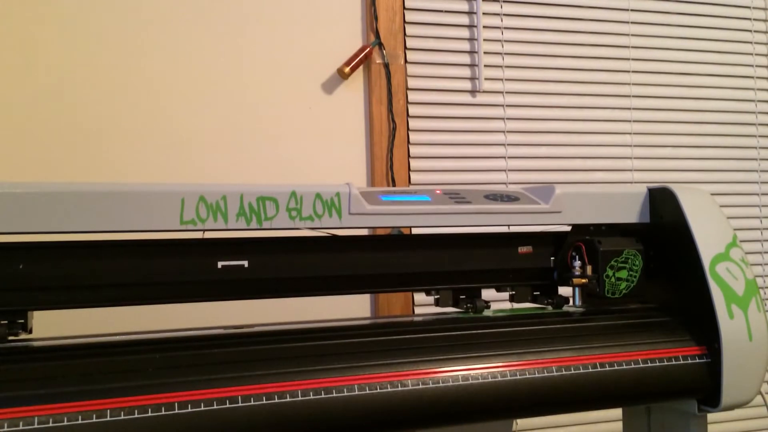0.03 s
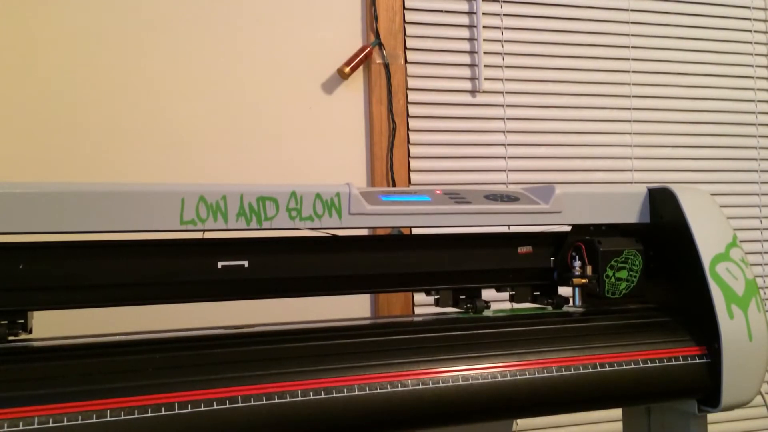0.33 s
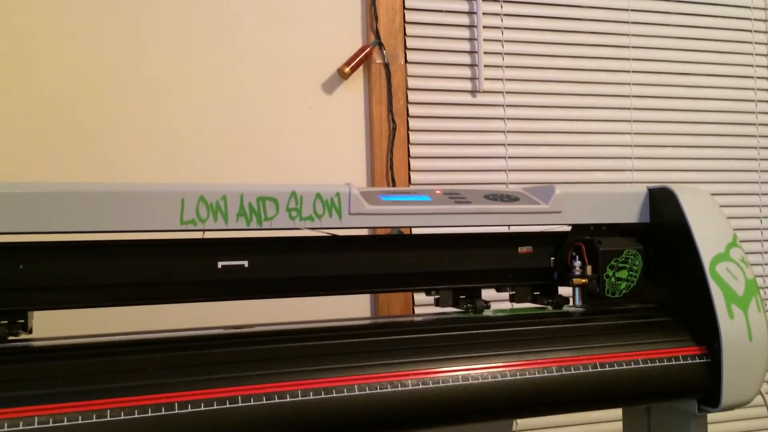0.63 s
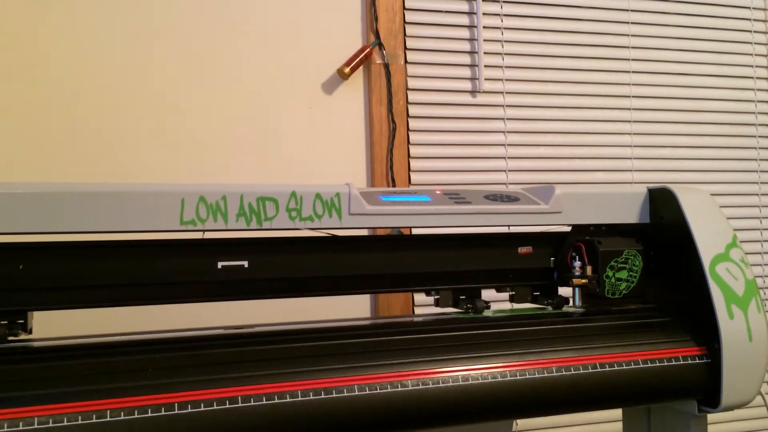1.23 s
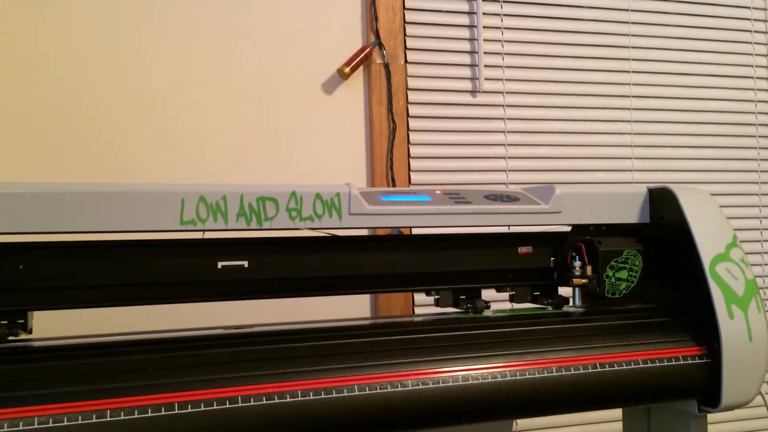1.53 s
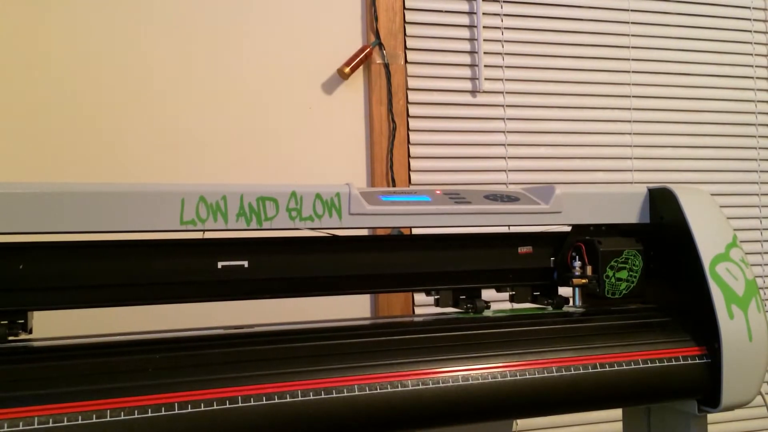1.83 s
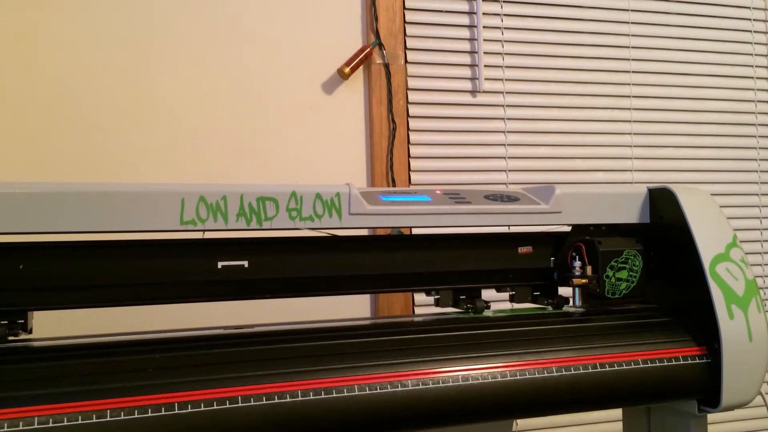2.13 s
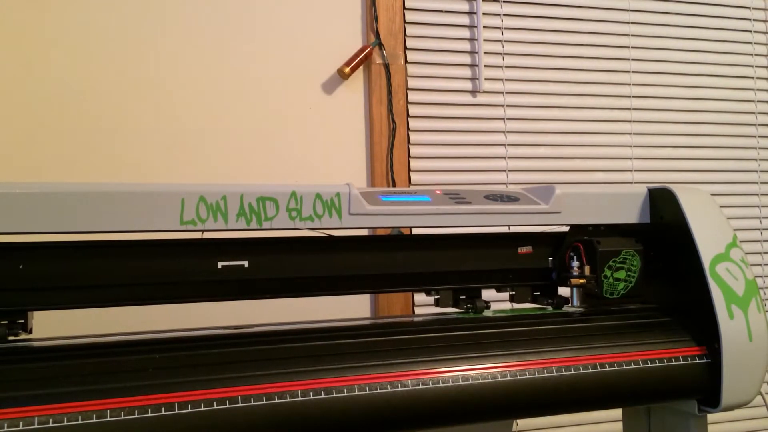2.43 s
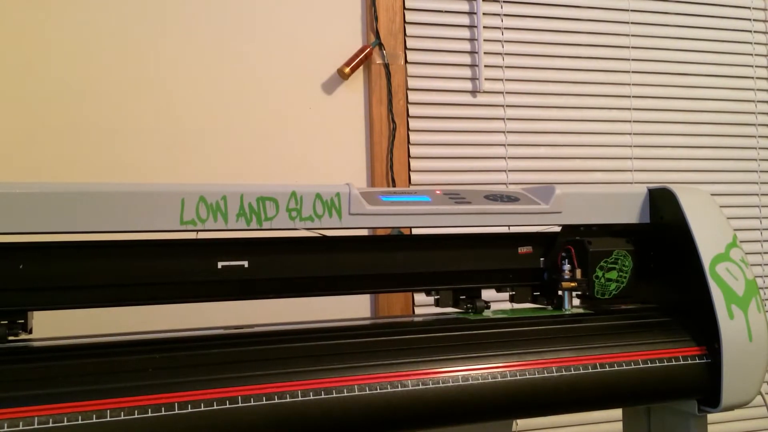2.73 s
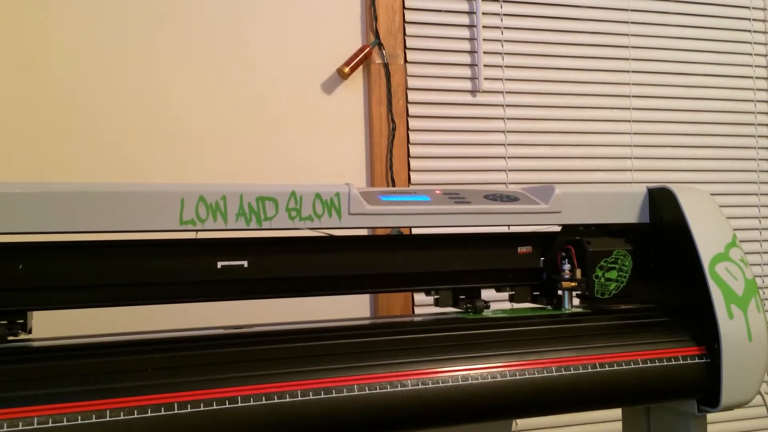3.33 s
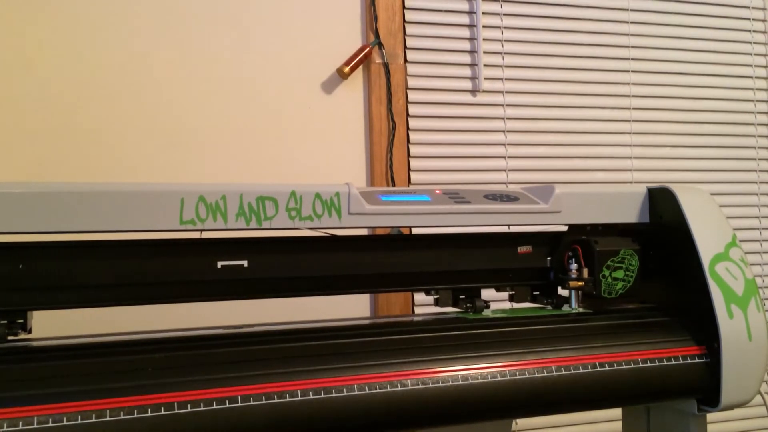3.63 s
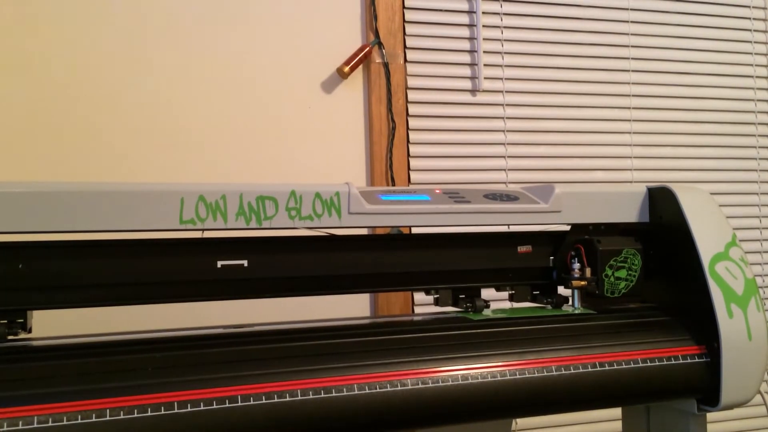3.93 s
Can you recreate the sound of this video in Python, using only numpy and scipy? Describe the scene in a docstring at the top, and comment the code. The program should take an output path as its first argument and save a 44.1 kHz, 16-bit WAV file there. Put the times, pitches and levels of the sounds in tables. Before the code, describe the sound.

A vinyl cutting machine idles with a quiet fan and electrical hum, with two faint ticks just after 2 seconds. At 2.5 seconds its carriage moves with a short buzz. The blade holder knocks down sharply at about 2.7 seconds, with a short, dull room echo. From then until 4 seconds the motors whir unevenly, with a pulsing ringing note, thin hiss and occasional light chatter.

```python
"""A vinyl cutter traces a curve: the tiny steps of its two motors shake the frame into an uneven whir.
Before the cut, the carriage (the part that carries the blade) makes a short, fast move with a buzz.
Then the blade holder knocks down, and it chatters now and then as the cut goes on.
A fan and the hum of mains power run throughout, and a small room adds a short, dull echo."""
import sys
import numpy as np
from scipy import signal
from scipy.fft import rfft, irfft, next_fast_len
from scipy.io import wavfile
from scipy.ndimage import map_coordinates

SR = 44100
rng = np.random.default_rng(int(sys.argv[2]) if len(sys.argv) > 2 else 0)


def pcm_store(signal):
    """Save signal as 16-bit PCM."""
    levels = np.round(np.clip(np.atleast_2d(signal), -1, 1) * 32767)
    wavfile.write(sys.argv[1], SR, levels.astype(np.int16).T)


N = 176400  # 4 seconds


def amp(db):
    """Turn decibels into a number to multiply a sound by."""
    return 10 ** (np.asarray(db) / 20)


def unit(x):
    """Scale a sound so that its average level (rms) is 1."""
    return x / np.sqrt(np.mean(x ** 2) + 1e-20)


def clock():
    """The time of each sample, in seconds."""
    return np.arange(N) / SR


def noise():
    """White noise: an even hiss."""
    return rng.standard_normal(N)


def curve(rows, column=1):
    """Join the points of a time table with straight lines, giving one value per sample."""
    columns = np.transpose(rows)
    return np.interp(clock(), columns[0], columns[column])


def wobble(per_second):
    """A smooth curve that passes through this many random values a second."""
    times = clock()[::32]
    values = map_coordinates(rng.standard_normal(2000), [times * per_second], mode="wrap")
    return np.interp(clock(), times, values)


def gate(start, end, rise, fall):
    """Switch on between two times, with straight fades (all in seconds)."""
    return np.clip(np.minimum((clock() - start) / rise, (end - clock()) / fall), 0, 1)


def decay(start, t60):
    """Start suddenly, then fade by 60 dB every t60 seconds."""
    age = clock() - start
    return (age >= 0) * amp(-60 * np.abs(age) / t60)


def filtered(x, response):
    """Turn each frequency of a sound up or down by response(frequency)."""
    size = next_fast_len(N + SR // 2)
    return irfft(rfft(x, size) * response(np.fft.rfftfreq(size, 1 / SR)), size)[:N]


def coloured(x, points):
    """Shape a sound with (frequency [Hz], level [dB]) points, then scale it to level 1."""
    hz, db = np.transpose(points)
    return unit(filtered(x, lambda f: amp(np.interp(np.log(f + 1), np.log(hz), db))))


def resonate(x, peaks):
    """Make a sound ring at (frequency [Hz], width [Hz], level [dB]) peaks, then scale it to level 1."""
    low_hz = 0.62 * min(peak[0] for peak in peaks)
    high_hz = 0.89 * max(peak[0] for peak in peaks)

    def response(f):
        body = sum((-1) ** k * amp(db) * 1j * f * width / (hz * hz - f * f + 1j * f * width)
                   for k, (hz, width, db) in enumerate(peaks))
        edge_cut = np.sqrt((1 + (f / high_hz) ** 6) * (1 + (low_hz / (f + 1)) ** 6))
        return body / edge_cut
    return unit(filtered(x, response))


def tone(hz, db, drift, flutter_db):
    """A slightly unsteady note: its phase wanders by drift (radians), its level by flutter_db."""
    phase = 2 * np.pi * (hz * clock() + rng.random())
    level = np.sqrt(2) * amp(db + flutter_db * wobble(14))
    return level * np.sin(phase + drift * wobble(8.95))


def strike(start, notes, contact_s=0.00078):
    """One hit sets a part ringing at its own notes, each with a slightly random strength."""
    age = clock() - start
    live = (age > 0) & (age < 0.3)
    t = age[live]
    ring = sum(amp(db + rng.normal(0, 2.9) - 60 * t / t60) * np.sin(2 * np.pi * (hz * t + rng.random()))
               for hz, db, t60 in notes)
    hit = np.zeros(N)
    hit[live] = (1 - np.exp(-t / contact_s)) * ring
    return hit


def room_echo(x, dull_above_hz=2520, level_db=-5.5):
    """The short, dull echo from the walls of a small room."""
    tail = (noise() * decay(0.0035, t60=0.42))[:SR // 2]
    low_pass = signal.butter(2, dull_above_hz, fs=SR, output="sos")
    dull_tail = signal.sosfilt(low_pass, tail / np.linalg.norm(tail))
    return amp(level_db) * signal.fftconvolve(x, dull_tail)[:N]


def panels(x):
    """Add the brief ringing of the sheet-metal panels, then scale to level 1."""
    tail = (noise() * decay(0.001, t60=0.05))[:SR // 10]
    ringing = signal.fftconvolve(x, tail / np.linalg.norm(tail))[:N]
    return unit(x + 0.55 * ringing)


def idle():
    """The fan blows through the housing, mains power hums, and two faint ticks come before the move."""
    # the fan's rush of air (frequency [Hz], relative level [dB])
    air_colour = [(25, -25), (53, -15), (90, -8.5), (105, -8.5), (150, -6), (180, -6.5), (213, -11.5),
                  (245, -0.5), (301, -20.5), (354, -10.5), (438, -11), (590, -8.5), (710, -18.5),
                  (1060, -17), (1150, -26.5), (1500, -21), (3180, -34), (4500, -39), (6500, -44.5),
                  (10000, -47.5), (14000, -47.5), (15200, -55)]
    # where the housing rings (frequency [Hz], width [Hz], relative level [dB])
    housing_peaks = [(190, 65, -2.5), (262, 48, -1.5), (525, 16, 1), (589.4, 13.6, 1.5), (990, 91, -10),
                     (1532, 150, -14)]
    # notes of the mains and the fan (frequency [Hz], level [dB])
    hum_notes = [(120, -58.5), (942.5, -71.5), (1100, -77), (1200, -78)]
    # faint ticks (time [s], level [dB])
    tick_times = [(2.088, -71), (2.218, -67.5)]
    fan = amp(-54) * coloured(noise(), air_colour) + amp(-58.5) * resonate(noise(), housing_peaks)
    hum = sum(tone(hz, db, drift=0.16, flutter_db=-0.9) for hz, db in hum_notes)
    bright_hiss = coloured(noise(), [(1500, -27), (5500, 0), (9000, -4), (15000, -3)])
    ticks = bright_hiss * sum(amp(db) * decay(start, t60=0.16) for start, db in tick_times)
    return fan + hum + ticks


def stand_shudder():
    """A low note swells briefly as the motors shake the stand."""
    # shudders (time of peak [s], half length [s], level [dB])
    shudders = [(3.189, 0.031, -39.5), (3.552, 0.019, -46), (3.83, 0.022, -48)]
    swell = sum(amp(db) * np.exp(-((clock() - peak) / half) ** 2) for peak, half, db in shudders)
    return swell * tone(hz=172, db=0, drift=0.6, flutter_db=1)


def fast_move(step_hz=131.45):
    """The carriage jerks into motion, buzzes at a steady step rate over its rushing wheels, and brakes."""
    # notes of the stepper motor (multiple of the step rate, level [dB])
    motor_notes = [(3, -47), (7, -45.5), (9, -44.5), (11, -61), (12, -49.5), (14, -47.5), (17, -55),
                   (18, -65), (21, -66), (24, -46.5), (30, -65), (31, -65), (39, -61), (42, -68),
                   (48, -66.5)]
    # notes unrelated to the step rate, likely the belt drive (frequency [Hz], level [dB])
    belt_notes = [(840, -61), (1432, -55), (2035, -62), (3435, -66)]
    # a low note that swells during the move (time [s], level [dB])
    swell_level = [(2.52, -52), (2.565, -37.5), (2.61, -42), (2.65, -49), (2.72, -52)]
    # the rush of the wheels (frequency [Hz], relative level [dB])
    wheel_colour = [(60, -51), (170, 7.5), (400, 0.5), (570, 2.5), (800, -3.5), (1400, 0), (1750, -5),
                    (2150, 2.5), (2500, -11), (3700, -20), (4050, -6.5), (4400, -14), (5500, -16.5),
                    (7000, -23), (9300, -22.5), (11000, -28), (13800, -19), (15200, -23)]
    # jolts of starting and braking (time [s], level [dB])
    jerk_times = [(2.504, -32), (2.71, -33)]
    # frame notes they ring (frequency [Hz], relative level [dB], time to fade 60 dB [s])
    frame_notes = [(562, 0.5, 0.14), (1474, -4, 0.14), (2310, -14, 0.068), (4120, -19, .13)]
    notes = [(multiple * step_hz, db) for multiple, db in motor_notes] + belt_notes
    buzz = sum(tone(hz, db, drift=0.24, flutter_db=2.2) * amp(0.77 * wobble(150)) for hz, db in notes)
    buzz += tone(hz=278.6, db=curve(swell_level), drift=0.2, flutter_db=0.8)
    buzz *= gate(start=2.517, end=2.722, rise=0.012, fall=0.012)
    rush = amp(-40.5) * coloured(panels(noise()), wheel_colour)
    rush *= gate(start=2.498, end=2.745, rise=0.015, fall=0.046)
    jerks = sum(amp(db) * strike(start, frame_notes) for start, db in jerk_times)
    return buzz + rush + room_echo(rush) + jerks


def blade_drop(low_cut_hz=140):
    """The blade holder slams down, bounces twice, and chatters now and then during the cut."""
    # the drop, bounces and chatter (time [s], relative level [dB])
    hits = [(2.738, -19.5), (2.7445, -30), (2.7538, -30.5), (2.861, -47), (3.068, -48), (3.131, -37.5),
            (3.216, -35), (3.243, -44), (3.375, -38.5), (3.701, -57)]
    # the holder's own notes (frequency [Hz], relative level [dB], time to fade 60 dB [s])
    holder_notes = [(367, -29, 0.049), (515, -4, .1), (703, -7, 0.11), (906, -2, .08), (1005, 2.5, 0.071),
                    (1165, -3, .08), (1508, -1.5, 0.057), (1620, -21, 0.074), (1840, -27, .05),
                    (2340, -11, 0.12), (2643, -8, 0.031), (3270, -21, 0.25)]
    # the burst of noise at each hit (frequency [Hz], relative level [dB])
    crack_colour = [(40, -45), (150, -10), (400, -1.5), (1000, -6), (2400, -13), (4000, -29), (7000, -41),
                    (15000, -56)]
    ring = sum(amp(db) * strike(start, holder_notes) for start, db in hits)
    bursts = sum(amp(db) * decay(start, t60=0.072) for start, db in hits)
    crack = bursts * coloured(noise(), crack_colour)
    high_pass = signal.butter(2, low_cut_hz, "high", fs=SR, output="sos")
    return signal.sosfilt(high_pass, amp(-4.5) * ring + amp(-2.5) * crack)


def motor_steps(step_hz, jitter_steps=0.035):
    """A stepper motor turns in tiny steps: one jolt each, uneven in time and size."""
    count = np.floor(np.cumsum(step_hz) / SR + jitter_steps * wobble(200))
    jolts = np.diff(count, prepend=count[0])
    return unit(jolts * amp(4.9 * noise()))


def cutting_hiss(jolts, judder):
    """Noise and motor jolts hiss through the panels, with a thin whistle from the carriage rail."""
    # the hiss (frequency [Hz], relative level [dB])
    hiss_colour = [(1500, -1.5), (2500, -0.5), (2900, -1.5), (3150, -3), (3700, -4.5), (4030, -1.5),
                   (4250, -3.5), (4700, -3), (4880, 1.5), (5200, -6), (5700, -4.5), (6300, -11.5),
                   (7000, -11.5), (7350, -9.5), (7800, -14), (8750, -15), (9030, -10.5), (9350, -15.5),
                   (11000, -17.5), (12500, -15.5), (14000, -15), (14500, -12), (15200, -18)]
    # how it rises and falls (time [s], relative level [dB])
    hiss_level = [(2.8, -56), (2.826, -51.5), (3.006, -55), (3.03, -52), (3.064, -52), (3.136, -49),
                  (3.174, -56.5), (3.194, -51), (3.494, -58), (3.504, -54.5), (3.738, -50), (4.0, -50)]
    hiss = coloured(panels(noise() + amp(-9) * jolts), hiss_colour)
    whistle = amp(-7) * resonate(noise(), [(4042, 39, 0)])
    return amp(0.5 + curve(hiss_level) + 0.72 * judder) * unit(hiss + whistle)


def frame_ring(shaking):
    """The shaken frame's main note swells and fades over a quiet, steady, rough ringing."""
    # the frame's main peaks (frequency [Hz], width [Hz], relative level [dB])
    frame_peaks = [(562, 30, 0.5), (520, 46.5, -2.5)]
    # the note's swells (time [s], relative level [dB])
    ring_level = [(2.78, -46), (2.816, -29.5), (2.84, -48), (2.868, -25.5), (2.9, -39.5), (2.96, -39.5),
                  (3.006, -29.5), (3.05, -54), (3.08, -29.5), (3.12, -40), (3.25, -37.5), (3.29, -43),
                  (3.32, -24.5), (3.335, -37), (3.352, -24), (3.385, -44), (3.42, -34), (3.47, -58),
                  (3.51, -36.5), (3.58, -31), (3.61, -46.5), (3.65, -29.5), (3.68, -30), (3.703, -24),
                  (3.735, -37), (3.85, -38.5), (3.89, -47), (4, -28)]
    note = tone(hz=565, db=0, drift=1, flutter_db=-1)
    roughness = amp(-6.5) * resonate(shaking, frame_peaks)
    swells = amp(curve(ring_level) - 1 + 1.4 * wobble(70))
    steady = amp(-44) * resonate(noise(), frame_peaks)
    return swells * unit(note + roughness) + steady


def frame_whir(shaking, judder):
    """The shaken frame whirs in a low, a middle and a high range, and rings with thin, high notes."""
    # where each range rings (frequency [Hz], width [Hz], relative level [dB])
    low_peaks = [(162, 35, -2.5), (254, 36, -1), (320, 80, -2), (442, 90, -0.5)]
    mid_peaks = [(629, 37, 4.5), (735, 39, 0), (875, 24, 0.5), (1096, 43, -2), (1232, 40, 2),
                 (1340, 35, 0.5), (1442, 75, 1.5), (1550, 61, 0), (1740, 38, -3)]
    high_peaks = [(1833, 22, -2.5), (1925, 5.7, 6.5), (2098, 53, -3), (2090, 12, 3), (2185, 69, -1.5),
                  (2390, 43, -25)]
    # how each range rises and falls (time [s], relative level [dB])
    low_level = [(2.8, -41.5), (3.14, -44.5), (3.174, -41.5), (3.226, -43.5), (3.518, -46), (3.564, -41.5),
                 (3.654, -48.5), (3.722, -39), (3.738, -46.5), (3.846, -41), (3.986, -45), (4.0, -53)]
    mid_level = [(2.8, -39.5), (2.86, -36.5), (2.92, -38.5), (3.0, -40.5), (3.08, -37), (3.145, -36.5),
                 (3.17, -42), (3.23, -35), (3.3, -40), (3.36, -41.5), (3.46, -47.5), (3.55, -43),
                 (3.67, -40), (3.8, -38.5), (3.9, -38.5), (4, -39)]
    high_level = [(2.8, -41.5), (2.94, -41.5), (3.06, -46), (3.064, -47), (3.156, -39.5), (3.176, -59),
                  (3.184, -47), (3.368, -40), (3.978, -47.5), (4.0, -56)]
    # thin, high notes of the ringing frame (frequency [Hz], level relative to the high whir [dB])
    high_frame_notes = [(1868, -4), (1917, -17.5), (2111, -5.5), (2210, -8)]
    thin_notes = sum(tone(hz, db, drift=0.9, flutter_db=-0.5) for hz, db in high_frame_notes)
    low = amp(curve(low_level)) * resonate(shaking, low_peaks)
    mid = amp(curve(mid_level) + 1.27 * judder) * resonate(shaking, mid_peaks)
    high = amp(curve(high_level) - 0.5) * unit(resonate(shaking, high_peaks) + thin_notes)
    return low + mid + high


def cutting(start_s=2.745, rise_s=0.027, rolling_db=3.5):
    """Two motors change speed to trace a curve; their steps and the rolling noise shake the frame."""
    # motor speeds (time [s], carriage step rate [Hz], roller step rate [Hz])
    step_rates = [(2.75, 95.26, 200.3), (3.1, 149.8, 160.2), (3.45, 235, 60.54), (3.75, 140.1, 170.4),
                  (4, 96.2, 205.1)]
    carriage = motor_steps(curve(step_rates, column=1))
    roller = motor_steps(curve(step_rates, column=2))
    jolts = unit(carriage + roller)
    shaking = jolts + amp(rolling_db) * noise()
    judder = wobble(55)  # makes the middle range and the hiss flicker together
    fade_in = np.clip((clock() - start_s) / rise_s, 0, 1)
    return fade_in * (cutting_hiss(jolts, judder) + frame_ring(shaking) + frame_whir(shaking, judder))


def scene():
    """Mix the idling machine, its move, the knock and the cut into one channel."""
    knock = blade_drop()
    mix = idle() + fast_move() + knock + room_echo(knock) + cutting() + stand_shudder()
    return mix[None]


def record(dry, top_hz=15280):
    """Remove the very highest treble."""
    return filtered(dry[0], lambda hz: hz < top_hz)[None]


dry = scene()
out = record(dry)
pcm_store(out)
```